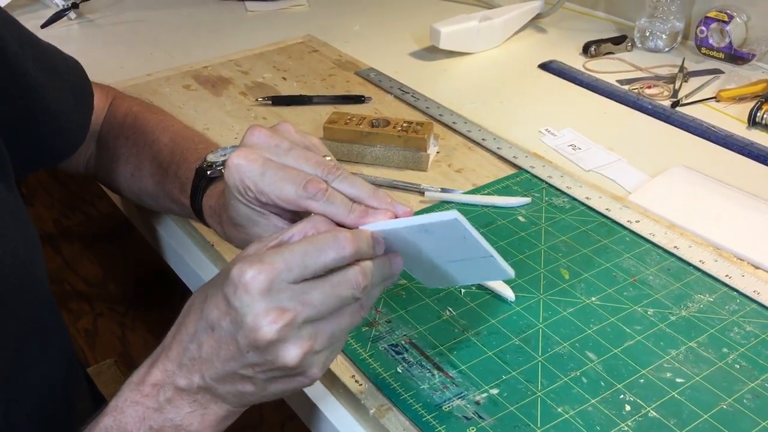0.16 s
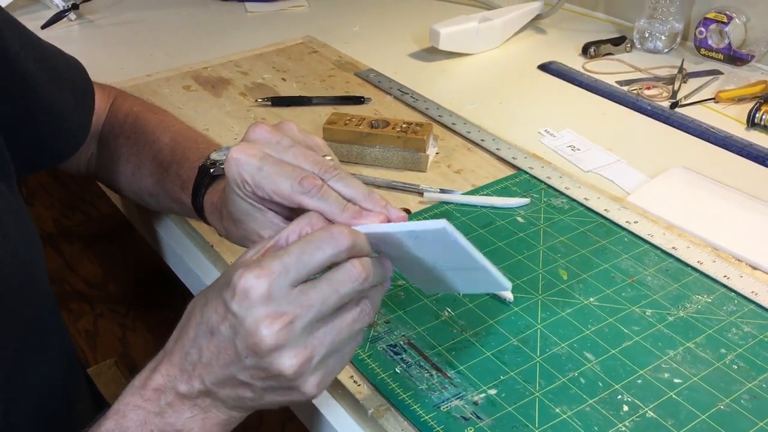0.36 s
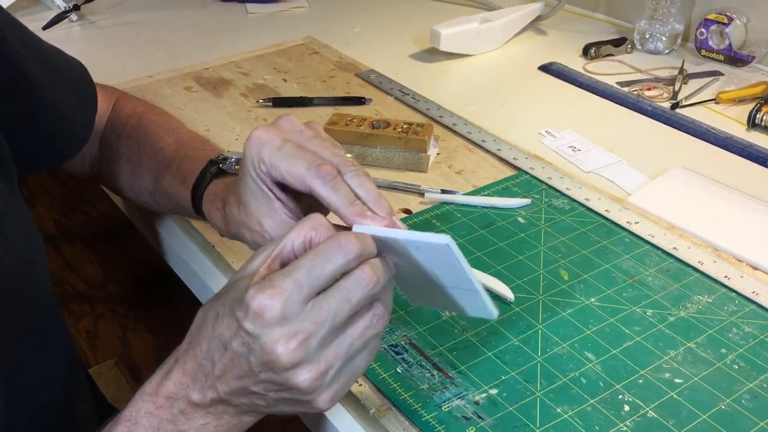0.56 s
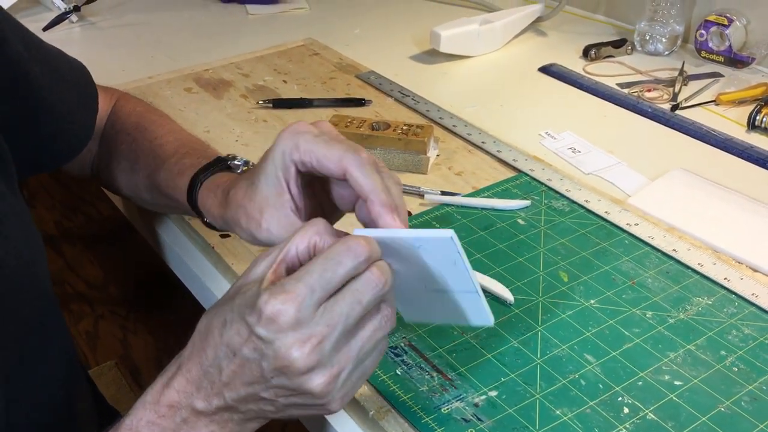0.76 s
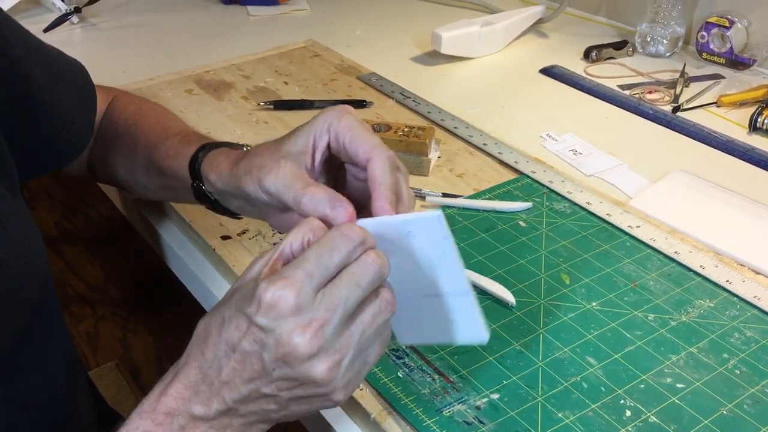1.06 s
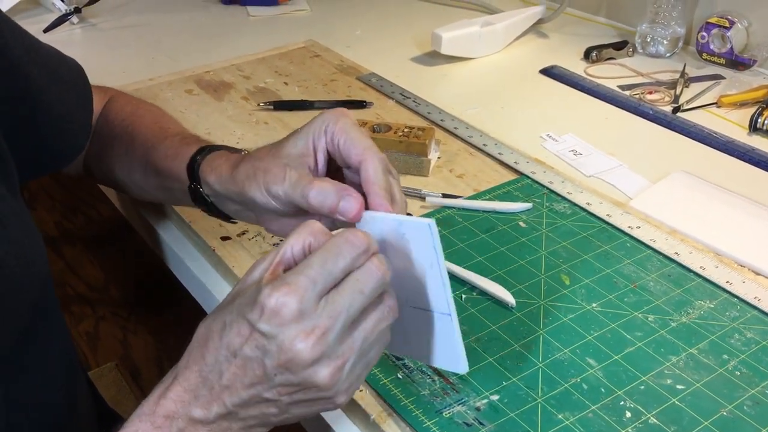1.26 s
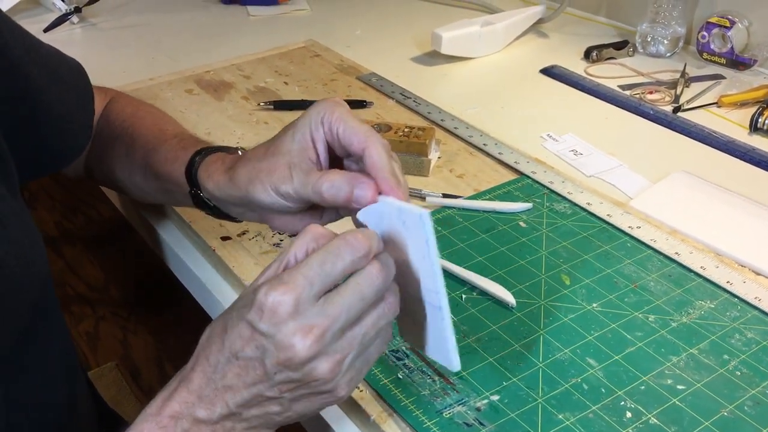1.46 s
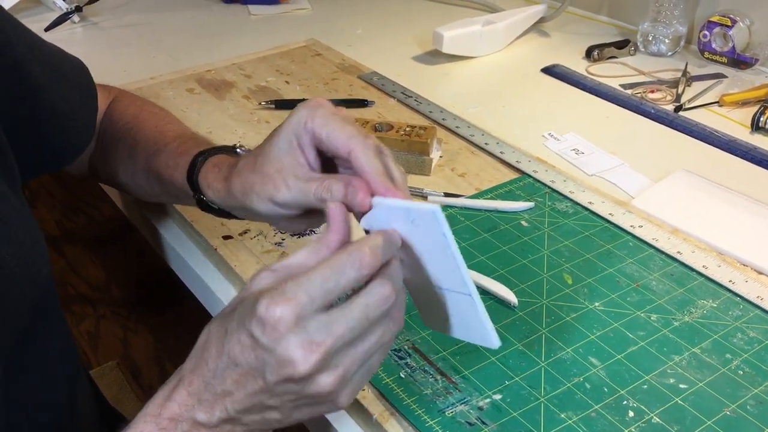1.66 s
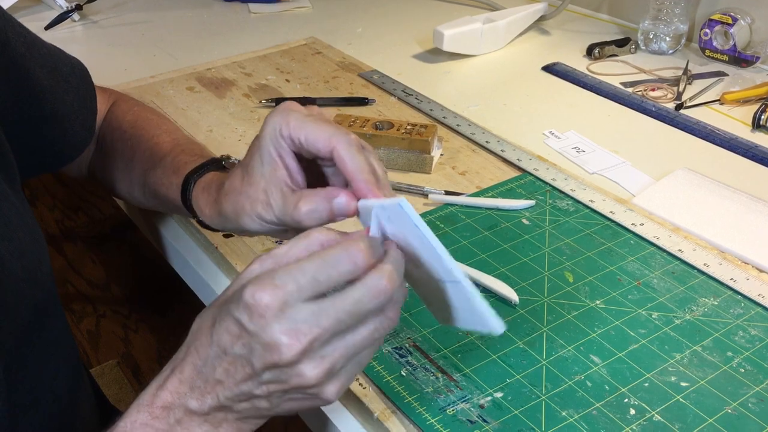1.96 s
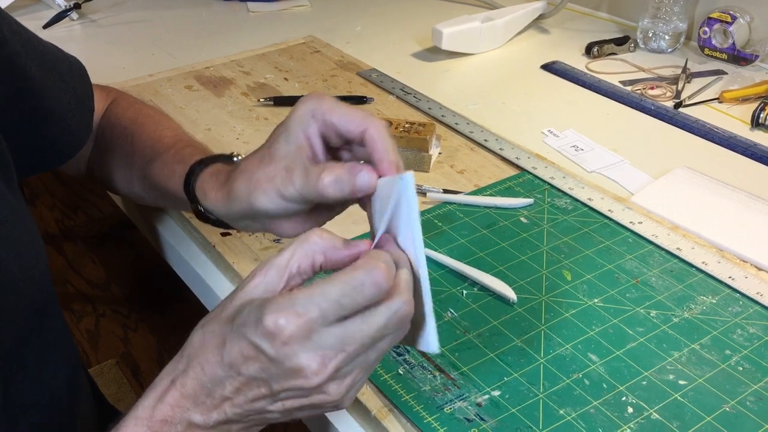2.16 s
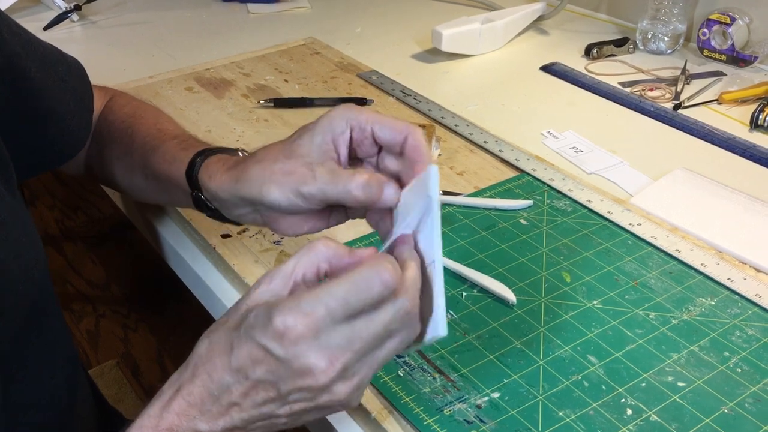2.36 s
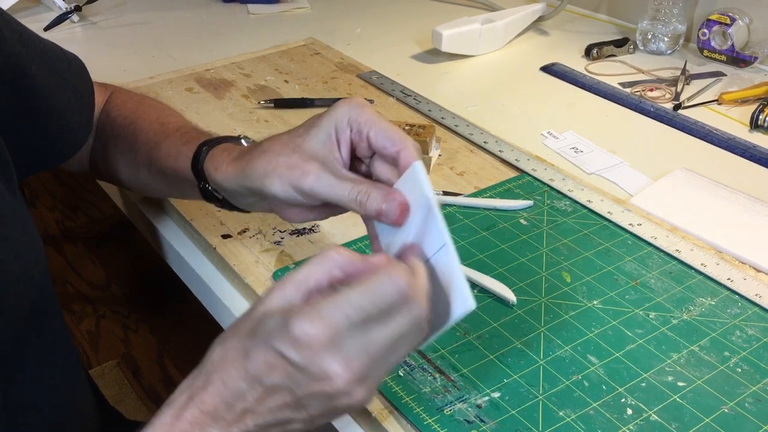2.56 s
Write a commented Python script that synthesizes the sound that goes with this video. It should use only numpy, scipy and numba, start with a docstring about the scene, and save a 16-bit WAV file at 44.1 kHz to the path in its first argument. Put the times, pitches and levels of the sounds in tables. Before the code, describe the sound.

Paper facing is peeled from foam board: faint nail creaks and crackly picking, soft finger rubbing, a short rip, a quiet gap, then longer louder tears, close to the microphone in a small quiet room.

```python
"""A fingernail picks and creaks at a corner of foam board over a low hum, held over a workbench in a small room.
Fingers slide on the paper facing, then it rips away in four pulls; the flexing board snaps.
Rips and rubbing are random impulse showers through body resonances; creaks, ticks and snaps are single clicks.
The hum is a wavering sine over filtered noise; bench and walls add short echoes."""
import sys
import numpy as np
from scipy import signal
from scipy.fft import rfft, irfft
from scipy.io import wavfile
from numba import njit

SR = 44100
rng = np.random.default_rng(int(sys.argv[2]) if len(sys.argv) > 2 else 0)


def unload_wav(signal):
    """Save mono or channel-first audio to the path in sys.argv[1] as 16-bit WAV at rate SR, clipped to [-1, 1]."""
    wavfile.write(
        sys.argv[1],
        SR,
        np.round(np.clip(np.atleast_2d(signal).T, -1, 1) * 32767).astype(np.int16),
    )


N = 119070
T = np.arange(N) / SR  # s
TOP_HZ = 16050  # upper band limit


def amp(db):
    """Amplitude factor from dB."""
    return 10 ** (np.asarray(db) / 20)


def unit(x):
    """Scale to rms 1."""
    return x / np.sqrt(np.mean(x ** 2))


def envelope(rows):
    """Gain from (s, dB) points, fading quickly outside them."""
    s, db = np.array(rows).T
    outside_s = np.maximum(s[0] - T, 0) + np.maximum(T - s[-1], 0)
    return amp(np.interp(T, s, db)) * np.exp(-outside_s / 0.0038)


def walk(rate_hz):
    """Random wander with a spread near 1: straight lines between rate_hz random points per second."""
    points = rng.standard_normal(N // 8)
    return 1.2 * np.interp(T * rate_hz, np.arange(N // 8), points)


def body(colour, ring=(), tilt_db=0, size=4096):
    """Causal (minimum-phase) response of unit energy: a broad colour, tilted, with resonances on top."""
    f = np.maximum(np.fft.rfftfreq(size, 1 / SR), 1)
    hz, db = np.array(colour).T
    colour_db = np.interp(np.log(f), np.log(hz), db)
    # dB per octave above 3 kHz, limited to -1..4
    treble_db = np.clip(tilt_db, -1, 4) * np.log2(np.clip(f, 3000, TOP_HZ))
    resonances = sum(amp(g) / (1 + 2j * (f - c) / w) for c, w, g in ring)
    gain = amp(colour_db + treble_db) * np.abs(1 + resonances)
    # folding the cepstrum forward gives minimum phase
    cepstrum = irfft(np.log(gain / gain.max() + 1e-5))
    cepstrum[1:size // 2] *= 2
    cepstrum[size // 2 + 1:] = 0
    response = np.exp(rfft(cepstrum))
    return irfft(response / np.sqrt(np.mean(np.abs(response) ** 2 * (f < TOP_HZ))))


def through(x, response):
    """Ring a body with x."""
    return signal.fftconvolve(x, response)[:N]


def grains(per_s, spread_db):
    """A shower of tiny impulses of uneven size and random sign, rms 1."""
    chance, size, sign = rng.random(N), rng.standard_normal(N), rng.choice([-1, 1], N)
    struck = chance < per_s / SR
    return unit(struck * sign * amp(spread_db * np.clip(size, -2, 2)))


@njit
def resonate(x, hz, width_hz):
    """Band-pass with a moving centre, gain 1 there (state-variable filter)."""
    y, band, low = np.empty(len(x)), 0., 0.
    for i in range(len(x)):
        g, k = np.tan(np.pi * hz[i] / SR), width_hz / hz[i]
        v = (band + g * (x[i] - low)) / (1 + g * (g + k))
        band, low, y[i] = 2 * v - band, low + 2 * g * v, k * v
    return y


def click(start_s, db, response, rattle, decay_s, size=2048):
    """A sharp release and a brief rattle after it; the level is the rms over 4 ms."""
    age_s = np.arange(size) / SR
    push = rattle * unit(rng.choice([-1, 1], size) * np.exp(-age_s / decay_s)) / np.sqrt(size)
    push[0] = 1
    sound = signal.fftconvolve(push, response)
    sound *= amp(db) * np.sqrt(.004 * SR / np.sum(sound ** 2))
    return np.pad(sound, (max(int(start_s * SR), 0), N))[:N]


def room_tone():
    """A wavering low hum over soft rumble and hiss, made of coloured noise."""
    floor_db, hum_hz, hum_db = -70, 56.5, -72.5
    # Noise colour. Each row: frequency in Hz, relative level in dB.
    floor_colour = [(20, -22), (40, -5.5), (65, -0.5), (85, -7), (130, -4.5), (200, -8), (300, -11.5),
                    (600, -16.5), (1200, -20.5), (2000, -18), (4000, -24.5), (16000, -29.5)]
    hum_phase = 2 * np.pi * np.cumsum(hum_hz + 2.4 * walk(12)) / SR
    hum = np.sqrt(2) * np.sin(hum_phase) * amp(hum_db + 0.43 * walk(21))
    return hum + amp(floor_db) * through(rng.standard_normal(N), body(floor_colour))


def room(x, bench_db, wall_db):
    """Quick scatter from the bench and a short, duller tail from the walls, both decaying noise."""
    def echoes(delay_s, t60_s):
        tail = rng.standard_normal(N) * (T > delay_s) * np.exp(-np.log(1000) * T / t60_s)
        return unit(tail) / np.sqrt(N)

    # (Hz, dB), then one resonance (Hz, width Hz, dB)
    wall_colour = [(100, -11.5), (900, 0), (2000, 1), (5000, -2.5), (9000, -4), (16000, -43)]
    walls = through(echoes(.008, t60_s=0.35), body(wall_colour, [(864, 32, 0)]))
    bench = echoes(0.0026, t60_s=0.024)
    return x + through(x, amp(bench_db) * bench + amp(wall_db) * walls)


def fingers():
    """Grain showers: nail crackling at the corner, skin sliding, flap brushing the fingers, grip bumping dully."""
    # Levels of nail, sliding skin, brushing flap and gripping hands. Each row: time in seconds, level in dB.
    picking, sliding = [(0.04, -89), (0.075, -71), (0.125, -94), (0.235, -77), (0.265, -62.5),
                        (0.305, -62.5), (0.335, -74), (0.37, -78), (0.385, -54), (0.44, -66.5),
                        (0.475, -56), (0.52, -50), (0.56, -61), (0.61, -53.5), (0.645, -61.5), (0.69, -70)], [(0.695, -50), (0.706, -54.5), (0.765, -61.5), (0.80, -68.5),
                                         (0.85, -68.5), (0.872, -58.5), (0.885, -51.5), (0.915, -61),
                                         (0.97, -71), (0.995, -67), (1.025, -61), (1.07, -57.5),
                                         (1.29, -63.5), (1.355, -68.5), (1.38, -60.5), (1.42, -60.5),
                                         (1.45, -68), (1.55, -88), (1.68, -91), (1.695, -61.5),
                                         (1.725, -84), (1.78, -67), (1.83, -58), (1.875, -58.5)]
    brushing, handling = [(2.33, -39), (2.37, -51.5), (2.40, -54.5), (2.425, -44), (2.465, -53.5),
                          (2.50, -50), (2.52, -46.5), (2.542, -61), (2.57, -60)], [(0.8, -90), (0.875, -81), (0.96, -85), (1.15, -73),
                                            (1.25, -74.5), (1.36, -80), (1.5, -87), (1.8, -77), (1.9, -68),
                                            (2.08, -74), (2.18, -66), (2.3, -77), (2.38, -68), (2.5, -93)]
    # Their colours. Each row: frequency in Hz, relative level in dB.
    pick_colour, slide_colour = [(470, -34), (1000, -25), (1600, -15), (2900, -29), (3800, -7.5),
                                 (4600, -12), (5600, -4), (7000, -5), (11000, 4.5), (14800, 1), (16000, -6)], [(100, -25), (200, -6.5), (450, -9.5), (660, -8.5),
                                                      (1200, -10), (1980, -6.5), (3370, -7), (5630, -4.5),
                                                      (12600, -7.5), (16000, -11)]
    brush_colour, handling_colour = [(120, -39), (200, -15), (635, -9.5), (1140, -8.5), (1350, -6.5),
                                     (1980, -5), (2330, -5), (6400, -2.5), (7140, -2.5), (8270, -7),
                                     (16000, -8)], [(40, -30), (110, -0.5), (170, 3), (280, -12.5),
                                                           (600, -31), (3000, -60)]
    # Resonances under skin and flap. Each row: centre in Hz, width in Hz, gain in dB.
    slide_ring, brush_ring = [(900, 60, -4), (2050, 150, -5), (3780, 200, -7), (5600, 250, -7)], [(1960, 78, 8.5), (4200, 270, -6), (7400, 270, 0),
                                                  (9300, 290, 2)]

    pick = through(grains(per_s=2600, spread_db=10.5) * envelope(picking), body(pick_colour))
    rubbing = grains(per_s=2800, spread_db=3) * amp(1.25 * walk(130))
    slide = through(rubbing * envelope(sliding), body(slide_colour, slide_ring))
    brush = through(grains(per_s=13000, spread_db=3.5) * envelope(brushing), body(brush_colour, brush_ring))
    grip = through(grains(per_s=170, spread_db=8) * envelope(handling), body(handling_colour))
    return pick + slide + brush + grip


def nail_creaks():
    """Stick-slip of the nail on the board edge: each slip is one click."""
    # Slips. Each row: start in seconds, level in dB.
    slips = [(0.0143, -59), (0.1469, -53), (0.1599, -52), (0.1777, -47.5), (0.1934, -47.5), (0.2099, -48),
             (0.222, -53), (0.2366, -52), (0.247, -54.5)]
    # Edge colour. Each row: frequency in Hz, relative level in dB.
    edge = body([(150, -43), (400, -7.5), (700, -8.5), (1000, -2.5), (1200, -7), (1550, 6.5), (1950, -7.5),
                 (2350, 5), (2650, -9), (2950, -14), (3900, -6), (4800, -18), (5800, -4.5), (8800, -15.5),
                 (11500, -11), (16000, -18.5)])
    return sum(click(s, db, edge, rattle=2.8, decay_s=0.0014) for s, db in slips)


def paper_ticks():
    """Crisp ticks of the paper, each with its own treble tilt."""
    # Ticks. Each row: start in seconds, level in dB, treble tilt in dB per octave (before the limits in body).
    tick_rows = [(0.259, -55, -3), (0.2718, -67, -5), (0.292, -57.5, -5), (0.306, -57, 5),
                 (0.3742, -62, -8), (0.379, -49, 6), (0.3853, -48, 11), (0.425, -64, 15),
                 (0.4487, -48.5, 5), (0.4648, -58, 2), (0.4705, -58, 3), (0.479, -52, 4), (0.487, -51, 4.5),
                 (0.4948, -57, -6), (0.5136, -45, 4), (0.5207, -51, 2), (0.5292, -46, 2),
                 (0.5455, -47.5, 5), (0.568, -59, 6), (0.5817, -47, 5.5), (0.607, -54.5, 0.5),
                 (0.6932, -43.5, 1), (0.7674, -49, -1), (0.860, -49, -5.5), (0.8781, -45, -4.5),
                 (0.979, -57, -3.5), (0.9891, -49.5, -4), (1.002, -44, -5), (1.037, -47.5, 1),
                 (1.054, -49, -7), (1.0783, -40, -3.5), (1.0959, -43, -3.5), (1.1037, -34.5, -7.5),
                 (1.125, -35.5, -9), (1.138, -35.5, -4.5), (1.1507, -29.5, -5.5), (1.264, -43, 1),
                 (1.8866, -48, 1), (1.996, -28, 6), (2.021, -40, -3.5), (2.17, -24.5, 4), (2.268, -37, 5),
                 (2.564, -45, 4.5)]
    # Paper colour. Each row: frequency in Hz, relative level in dB.
    tick_colour = [(200, -23), (500, -22), (900, -7), (1300, -14.5), (2000, -0.5), (2900, -5), (3800, -1.5),
                   (4700, -7.5), (5600, 1.5), (10000, -2.5), (14500, 1), (17000, 1)]
    # Resonances. Each row: centre in Hz, width in Hz, gain in dB.
    tick_ring = [(2145, 45, 4.5), (3680, 470, -3)]
    return sum(click(s, db, body(tick_colour, tick_ring, tilt_db), rattle=3.7, decay_s=0.0013)
               for s, db, tilt_db in tick_rows)


def board_snaps():
    """Snaps of the flexing board: shared resonances plus one main pitch per snap."""
    # Snaps. Each row: start in seconds, level in dB, main pitch in Hz, its width in Hz, its gain in dB.
    snap_rows = [(1.3645, -35, 5450, 1000, 10.5), (1.600, -70, 1780, 1200, 27),
                 (1.6175, -57.5, 2160, 700, 3), (1.645, -73, 2200, 1500, 0), (1.6865, -57.5, 1800, 1970, 5),
                 (1.765, -62.5, 1480, 1200, 28), (1.8313, -53.5, 1700, 1500, 16),
                 (2.4056, -37, 3750, 1190, 8), (2.5703, -40, 10000, 2140, 40),
                 (2.5744, -38.5, 1300, 696, 20)]
    # Board colour. Each row: frequency in Hz, relative level in dB.
    snap_colour = [(150, -17.5), (400, -7.5), (800, -6.5), (1400, -1.5), (3000, -2.5), (4200, 2),
                   (4700, -6.5), (5400, -4), (7500, -9.5), (16000, -9.5)]
    # Shared resonances. Each row: centre in Hz, width in Hz, gain in dB.
    snap_ring = [(394, 33, 11), (633, 37, 9), (880, 32, 5.5), (2090, 170, 4), (2720, 170, 0),
                 (3140, 180, 5)]
    return sum(click(s, db, body(snap_colour, snap_ring + [(hz, width_hz, gain_db)]), rattle=0.77, decay_s=0.00075)
               for s, db, hz, width_hz, gain_db in snap_rows)


def pull(force, colour, ring, db, per_s, catch_db):
    """Bonds between paper and foam break in uneven showers as the peel line catches; they ring the board."""
    catching = amp(catch_db * walk(640))
    breaks = unit(grains(per_s, spread_db=4.5) * catching)
    return through(breaks * envelope(force), body(colour, ring)) * amp(db)


def peeling():
    """Three careful pulls with ringing bent paper, then a fast one whose lengthening flap sings downward."""
    # Force of each pull; the creep is a light, bright end to the first.
    # Each row: time in seconds, level in dB before the pull's db trim.
    pull_1, creep_force, pull_2 = [(1.075, -69), (1.091, -43), (1.097, -34), (1.107, -37.5), (1.116, -35.5),
                                   (1.135, -30), (1.157, -32.5), (1.178, -32), (1.195, -49), (1.215, -57)], [(1.175, -44), (1.195, -37.5), (1.21, -47.5),
                                                   (1.232, -42.5), (1.258, -47.5), (1.274, -53.5),
                                                   (1.29, -58)], [(1.884, -44), (1.887, -37), (1.91, -34.5),
                                                                  (1.945, -30), (1.985, -35.5),
                                                                  (2.01, -30.5), (2.065, -29), (2.095, -32),
                                                                  (2.113, -37), (2.128, -35.5)]
    pull_3, pull_4 = [(2.13, -31), (2.136, -36), (2.2, -27), (2.252, -32), (2.27, -26), (2.322, -29),
                      (2.35, -47.5), (2.39, -46.5)], [(2.565, -71), (2.576, -49), (2.585, -34), (2.591, -27), (2.62, -25.5),
                                      (2.66, -23.5), (2.7, -23.5)]
    # Colour of board and paper as the grip changes. Each row: frequency in Hz, relative level in dB.
    colour_1, creep_colour, colour_2 = [(100, -49), (300, -21), (500, -26), (640, -16), (900, -7.5),
                                        (1200, -10.5), (1550, -11.5), (2020, -4.5), (2800, -2.5),
                                        (3450, -4.5), (4300, 2), (4650, -12), (5150, 1.5), (6800, -4.5),
                                        (13300, -7.5), (16000, -18)], [(180, -60), (300, -15), (614, -15), (774, -20),
                                                          (930, -11), (1230, -25), (1970, -9), (3830, -1),
                                                          (4750, -7), (5340, -4), (16000, -5)], [(60, -28), (150, -26),
                                                                                (360, -18), (450, -30),
                                                                                (580, -18), (1000, -17),
                                                                                (1500, -6.5), (2170, -3.5),
                                                                                (2860, -5.5), (4300, -2.5),
                                                                                (4900, -4), (5500, -0.5),
                                                                                (6200, -2.5), (9300, -2),
                                                                                (10500, -3), (15200, -3.5),
                                                                                (16000, -27)]
    colour_3, colour_4 = [(120, -67), (200, -25), (360, -15), (456, -18), (635, -14.5), (1350, -10.5),
                          (1480, -4.5), (1940, -8), (2210, -4.5), (2650, -6), (4350, -1), (9230, -1.5),
                          (10500, -4.5), (11900, -0.5), (16000, -9.5)], [(120, -71), (200, -22), (340, -38), (387, -21.5), (558, -36.5),
                                            (659, -22), (950, -10.5), (1180, -24), (1300, -12.5),
                                            (1450, -18), (1910, -9.5), (2470, -9), (3690, -2.5),
                                            (14100, -6.5), (16000, -19)]
    # Resonances of the held board. Each row: centre in Hz, width in Hz, gain in dB.
    ring_1, ring_2, ring_3, ring_4 = [(626, 47, 1), (906, 48, -4), (2050, 130, 0.5), (3400, 170, 3),
                                      (5460, 400, -14)], [(582, 26, 9), (900, 64, 0), (2180, 300, -12),
                                                      (5350, 200, -7), (9300, 440, -14)], [(610, 66, 1), (916, 130, 0.5),
                                                                      (1528, 30, 4.5), (2210, 210, 1),
                                                                      (4470, 150, -10), (8400, 250, -22)], [(880, 64, -8),
                                                                                      (1016, 54, -7),
                                                                                      (1370, 68, -11),
                                                                                      (1900, 150, -8),
                                                                                      (6100, 720, -11)]

    first = pull(pull_1, colour_1, ring_1, db=-2.5, per_s=7200, catch_db=1.4)
    creep = pull(creep_force, creep_colour, ring_1[1:3], db=-2.5, per_s=5400, catch_db=-0.5)
    second = pull(pull_2, colour_2, ring_2, db=-1.45, per_s=6000, catch_db=1.4)
    third = pull(pull_3, colour_3, ring_3, db=-1.5, per_s=9000, catch_db=1.5)
    fast = pull(pull_4, colour_4, ring_4, db=-1, per_s=26000, catch_db=-0.5)

    # while its flap is short, the second pull radiates less in this band
    short_flap_s, short_flap_db, short_flap_band_hz = 0.17, -9, [1000, 5940]
    shortness = np.clip(1 - (T - pull_2[0][0]) / short_flap_s, 0, 1)
    band_pass = signal.butter(2, short_flap_band_hz, "band", fs=SR, output="sos")
    mid_band = signal.sosfiltfilt(band_pass, second)
    careful = first + creep + second + mid_band * (amp(short_flap_db * shortness) - 1) + third

    # the bent paper rings at a pitch, and its octave, that shift with its curl
    curl_width_hz, curl_db = 130, -1.5
    curl_hz = 4440 * np.exp(np.clip(0.11 * walk(45), -.5, .5))
    curl = sum(resonate(careful, k * curl_hz, float(k * curl_width_hz)) for k in (1, 2))

    # the freed flap rings lower as it lengthens
    flap_start_hz, flap_sag_hz_per_s, flap_width_hz, flap_db = 4860, 14100, 150, 1
    sagging_hz = np.clip(flap_start_hz - flap_sag_hz_per_s * (T - pull_4[0][0]), 2000, 6000)
    flap = resonate(fast, sagging_hz * (1 + 0.064 * walk(100)), float(flap_width_hz))
    return careful + amp(curl_db) * curl + fast + amp(flap_db) * flap


def scene():
    """Tearing and clicks, each with its own echo levels, over the room tone."""
    tearing = room(peeling() + fingers(), bench_db=-8, wall_db=-22)
    clicks = room(nail_creaks() + paper_ticks() + board_snaps(), bench_db=-6, wall_db=-12.5)
    return (tearing + clicks + room_tone())[None]


def record(dry):
    """The recorder cuts the top: a steep low-pass."""
    return signal.sosfilt(signal.ellip(10, .2, 70, TOP_HZ, fs=SR, output="sos"), dry)


dry = scene()
out = record(dry)
unload_wav(out)
```